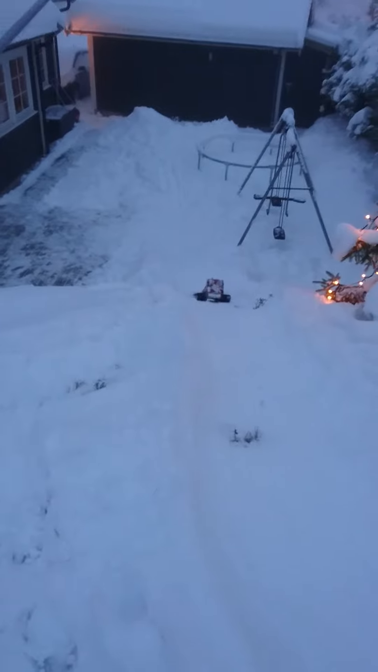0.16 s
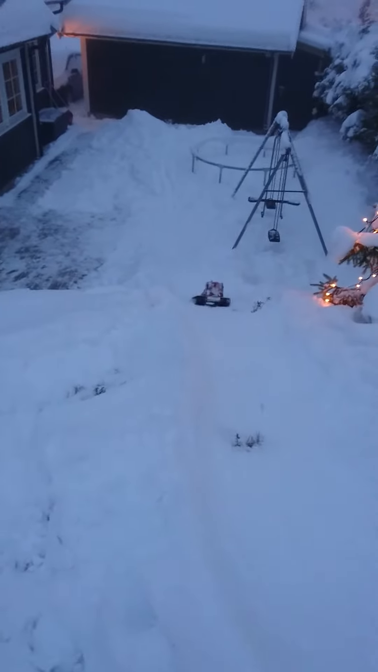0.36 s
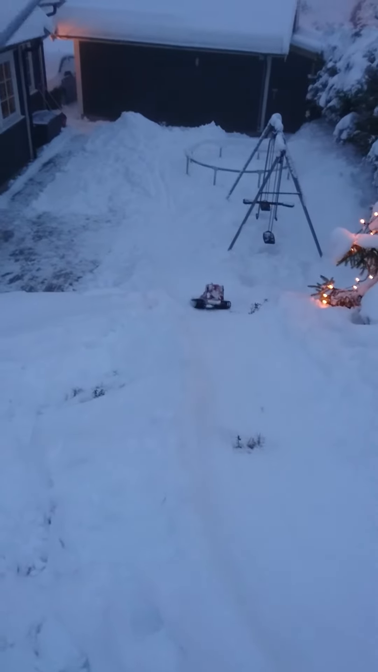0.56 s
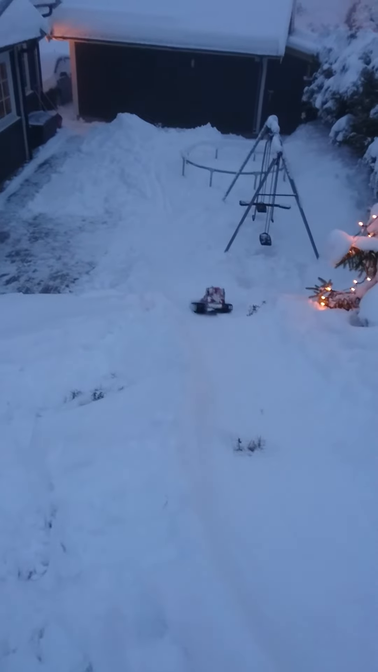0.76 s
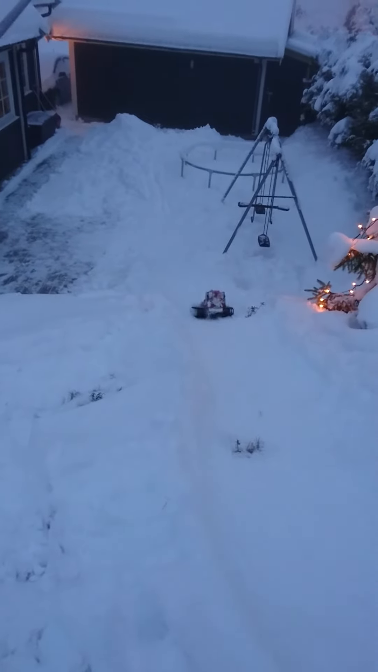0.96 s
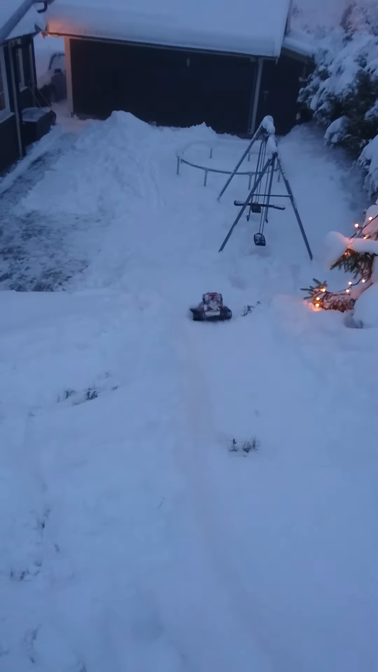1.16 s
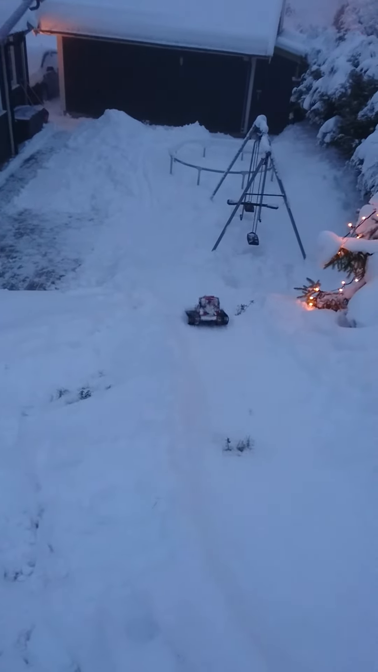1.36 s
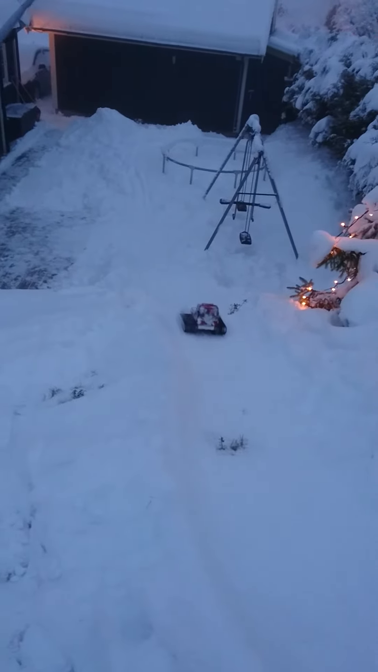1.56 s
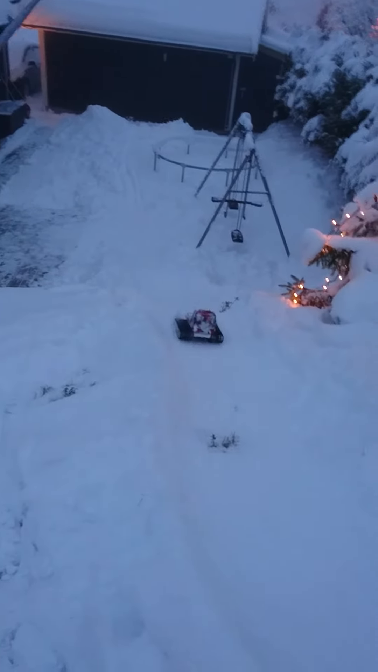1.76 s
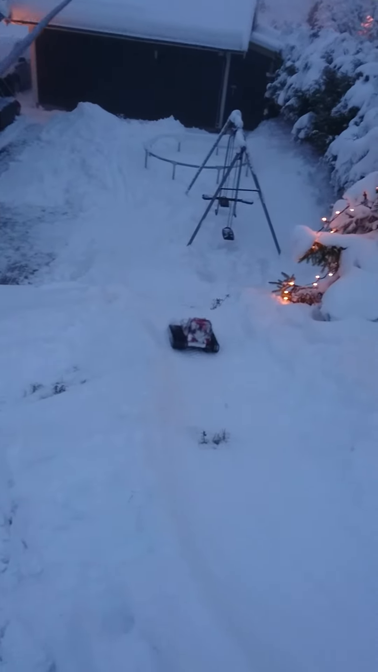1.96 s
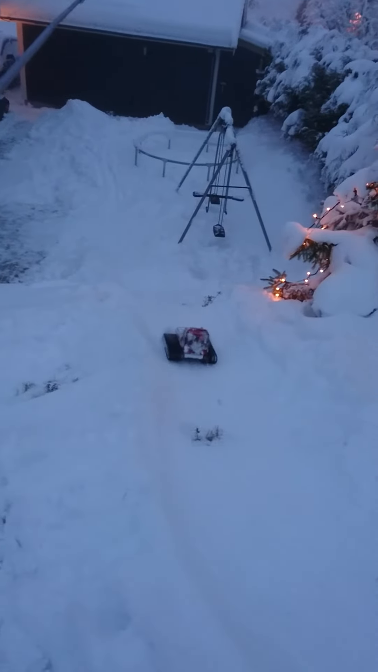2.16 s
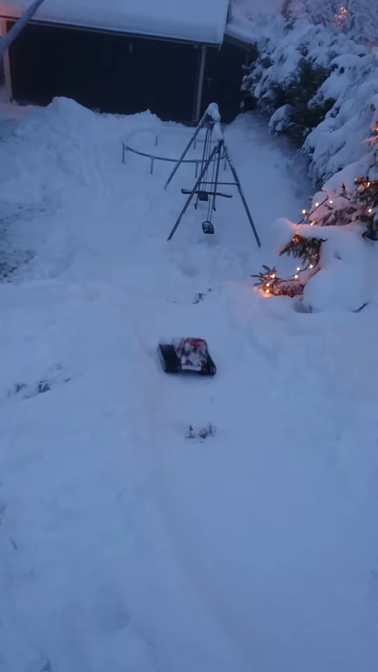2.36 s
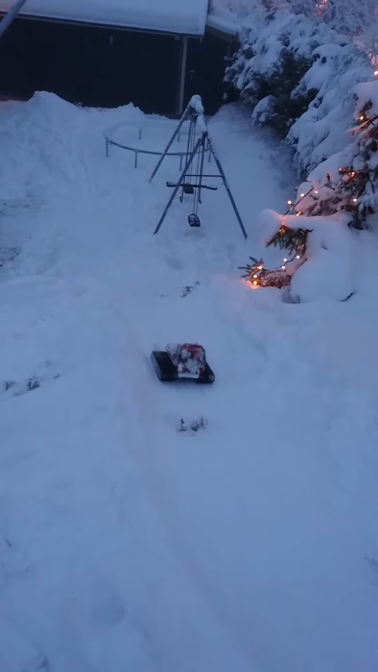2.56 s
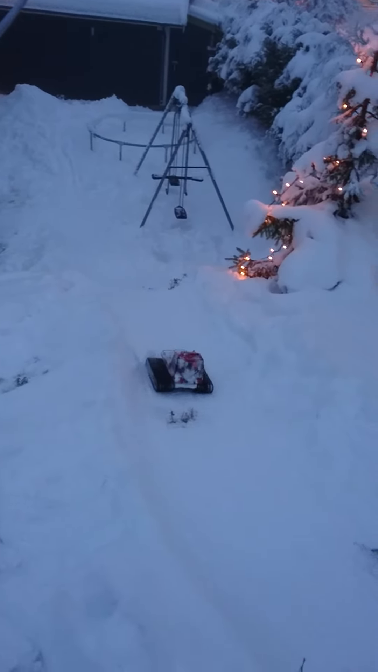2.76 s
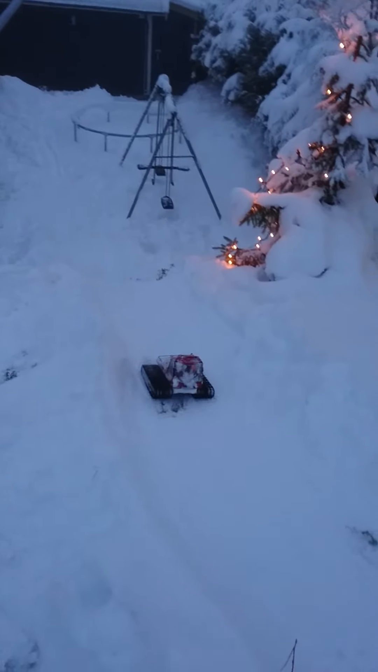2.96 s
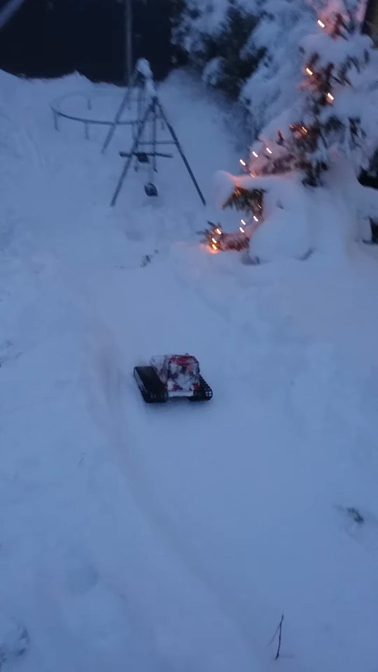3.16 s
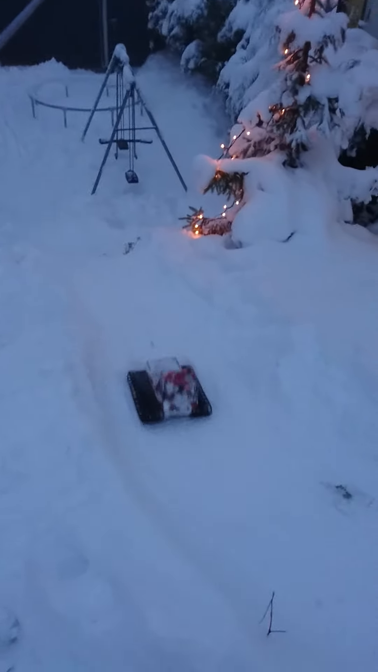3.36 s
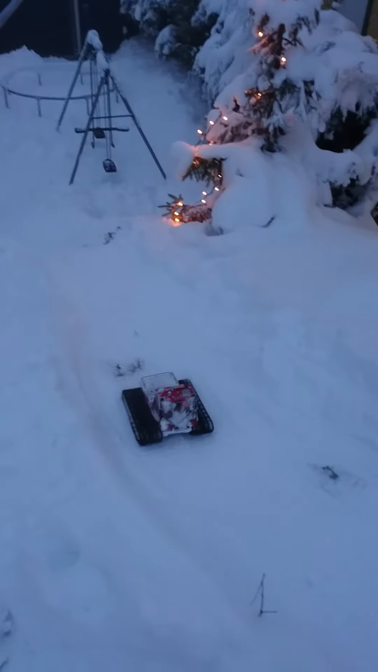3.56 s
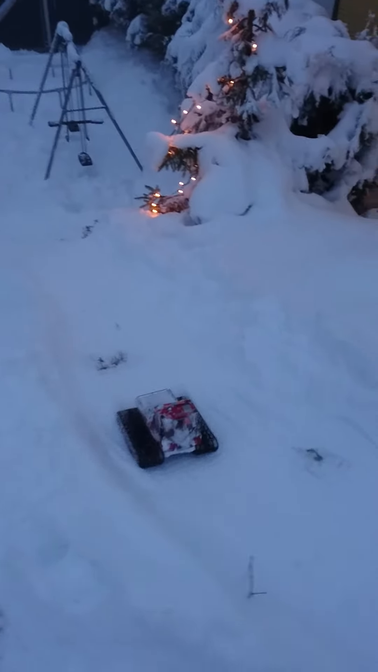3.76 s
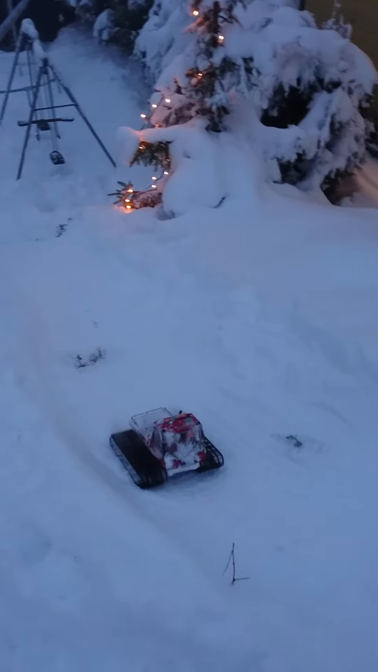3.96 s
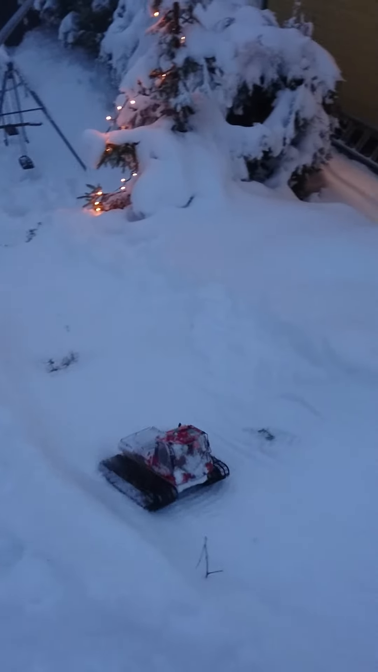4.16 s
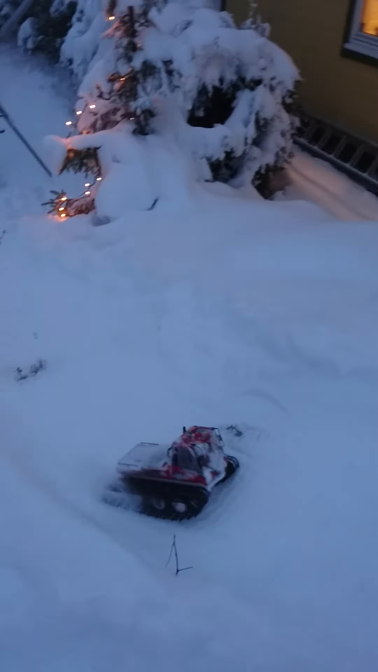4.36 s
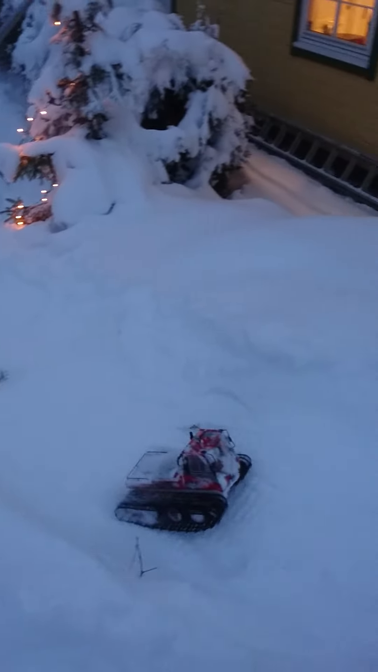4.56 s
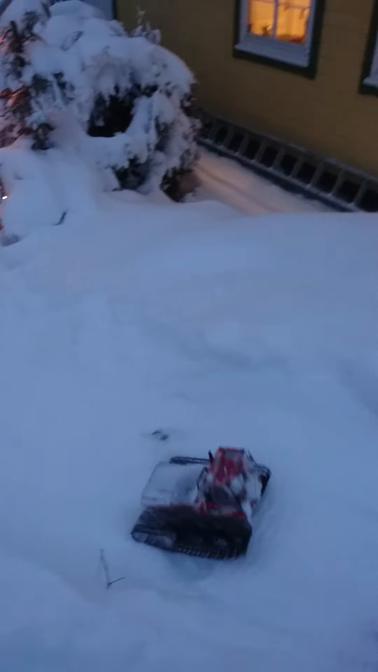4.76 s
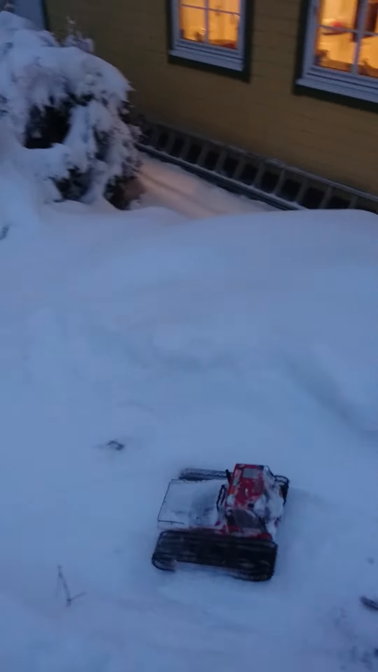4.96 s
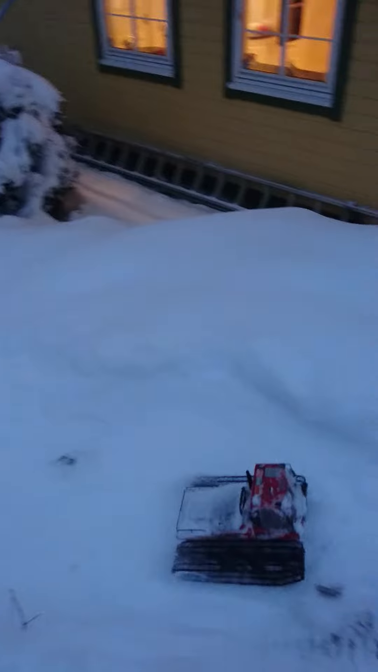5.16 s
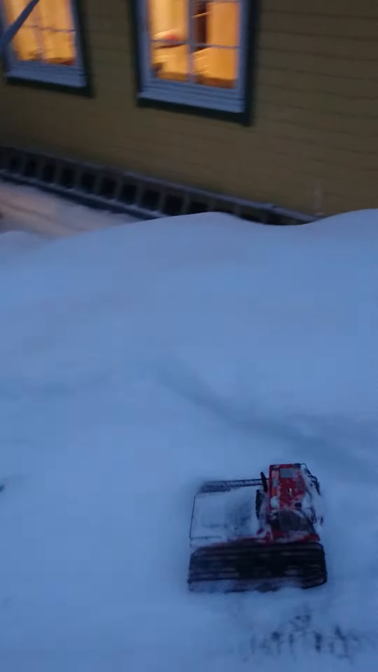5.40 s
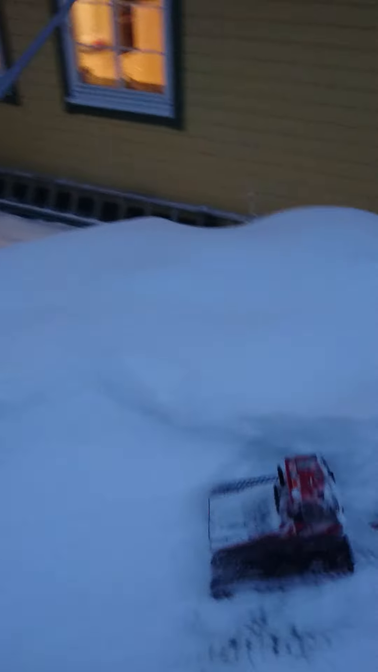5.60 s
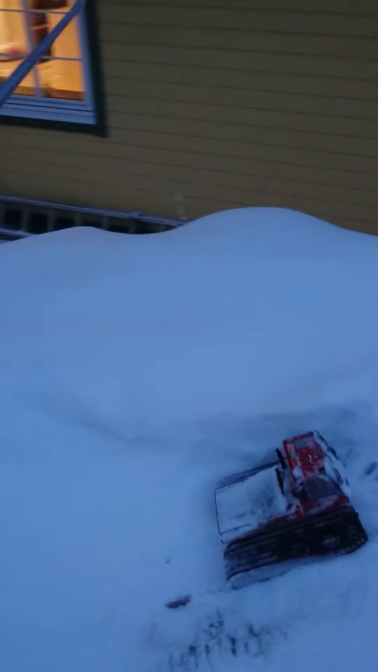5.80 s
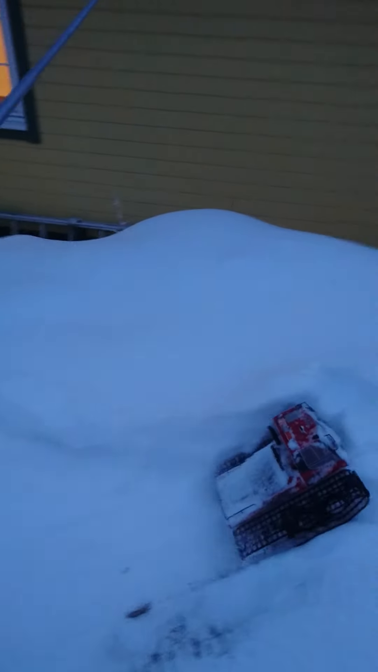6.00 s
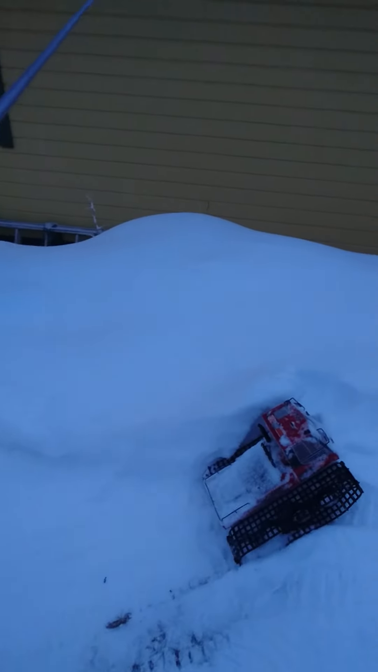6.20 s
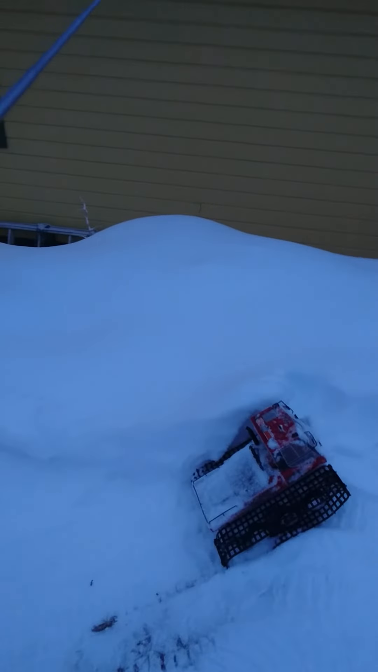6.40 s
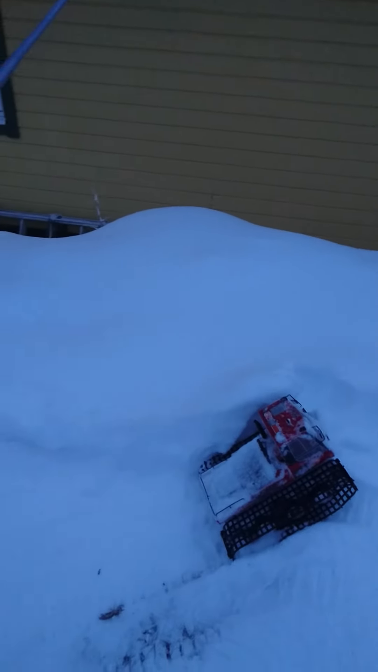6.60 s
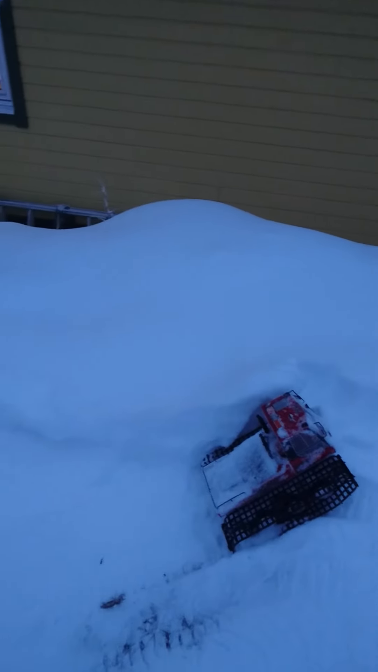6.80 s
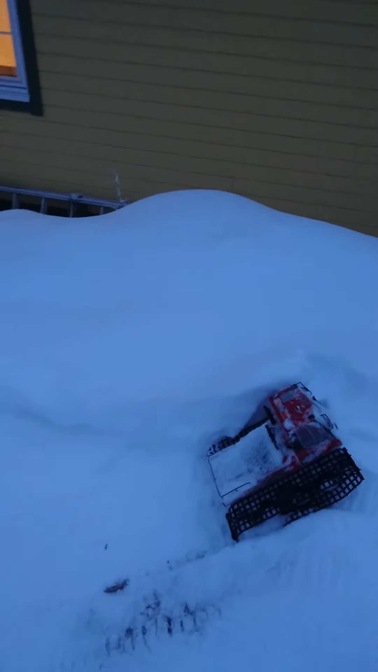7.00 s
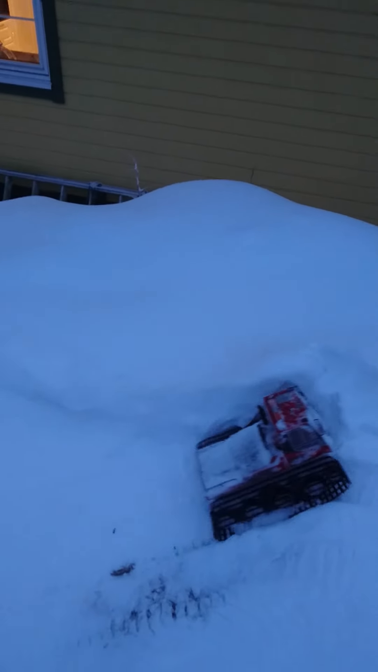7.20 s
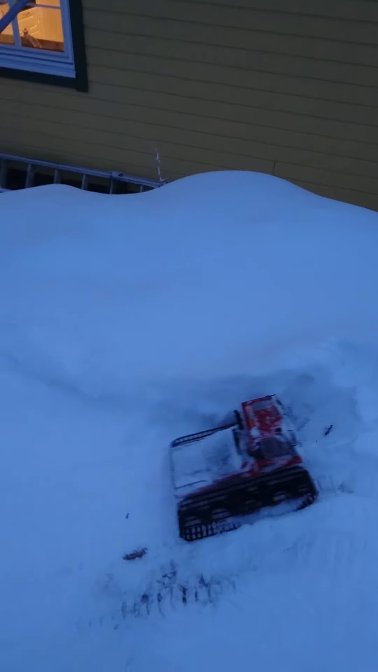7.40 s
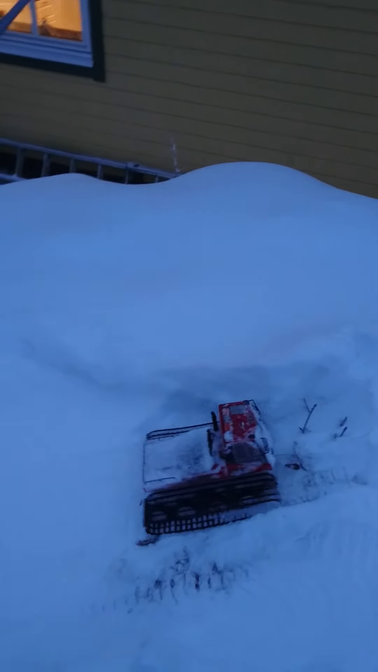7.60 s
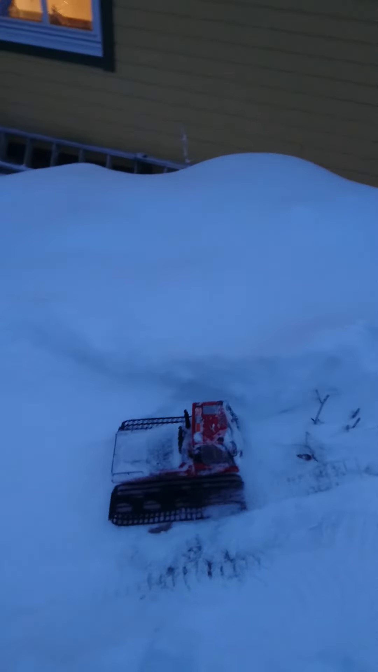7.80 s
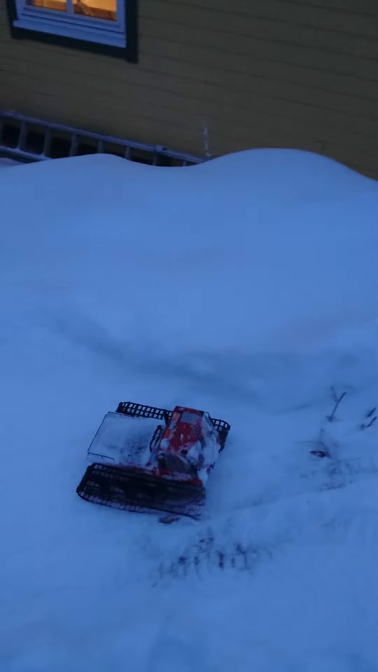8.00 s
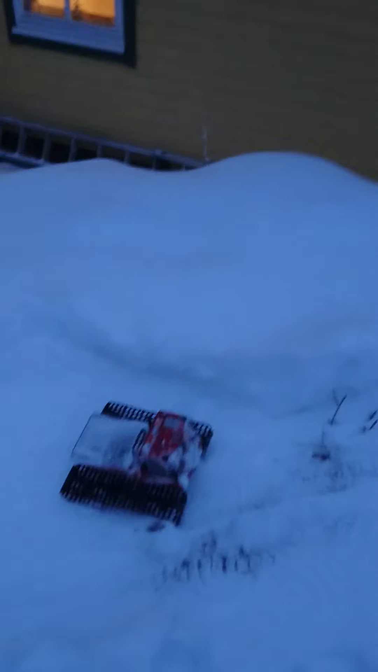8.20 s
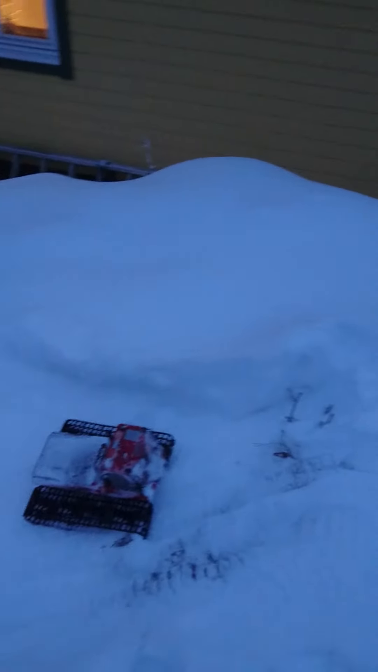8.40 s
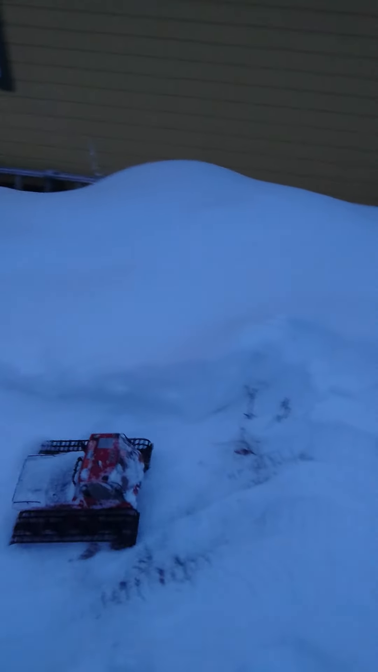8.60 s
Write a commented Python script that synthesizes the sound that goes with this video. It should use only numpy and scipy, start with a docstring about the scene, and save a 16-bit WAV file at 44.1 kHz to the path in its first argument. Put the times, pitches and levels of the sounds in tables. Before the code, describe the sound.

A small electric tracked model whines through snow, stops, then reverses, while fingers bump on the microphone.

```python
"""Model snow groomer in deep snow

Two geared electric track drives crawl closer, stop, then back away in a turn, one running slower.
Meshing teeth whine, cleats crush snow, links rattle and thrown crystals hiss. Fingers bump and rub
the hand-held camera's case and shade its right microphone port."""
import sys
import numpy as np
from scipy import signal
from scipy.fft import rfft, irfft, next_fast_len
from scipy.io import wavfile

SR = 44100
rng = np.random.default_rng(int(sys.argv[2]) if len(sys.argv) > 2 else 0)


def store_pcm(level_fs):
    """Save levels as 16-bit WAV."""
    pcm = np.round(np.clip(level_fs, -1, 1) * 32767).astype(np.int16)
    wavfile.write(sys.argv[1], SR, np.atleast_2d(pcm).T)


N = 381465
TIME = np.arange(N) / SR


def from_db(db):
    """Decibels to gain."""
    return 10 ** (np.asarray(db) / 20)


def rms_one(x):
    """Scale to unit power."""
    return x / np.sqrt(np.mean(np.abs(x) ** 2) + 1e-20)


def in_time(rows):
    """One linearly interpolated curve per column after time."""
    times, *columns = np.transpose(rows)
    return [np.interp(TIME, times, column) for column in columns]


def swells(rows):
    """Summed bell curves, one per column after time and half length."""
    return sum(np.outer(heights, np.exp(-((TIME - s) / half) ** 2)) for s, half, *heights in rows)


def table_gate(rows):
    """1 while the table lasts, with 10 ms fades."""
    return np.clip(np.minimum(TIME - rows[0][0], rows[-1][0] - TIME) * 100 + 1, 0, 1)


def run_envelope(start_s, end_s, rise_s=0.067, decay_s=0.031):
    """Linear run-up, hold, exponential run-down."""
    return np.clip((TIME - start_s) / rise_s, 0, 1) * np.exp(-np.clip((TIME - end_s) / decay_s, 0, 20))


def drift(rate_hz):
    """Smooth random curve of unit power."""
    size = next_fast_len(N)
    hz = np.arange(size // 2 + 1) * SR / size
    return rms_one(irfft(rfft(rng.standard_normal(size)) / (1 + (hz / rate_hz) ** 2), size)[:N])


def panned(pan_db):
    """Constant-power gains, left over right by pan_db."""
    ratio = from_db(np.atleast_1d(pan_db))
    return np.array([ratio, np.ones_like(ratio)]) * np.sqrt(2 / (1 + ratio ** 2))


def coloured(x, spectrum):
    """Shape x by a spectrum table; unit power."""
    size = next_fast_len(N)
    hz, db = np.transpose(spectrum)
    bins_hz = np.arange(size // 2 + 1) * SR / size + 1
    gain = from_db(np.interp(np.log(bins_hz), np.log(hz), db))
    return rms_one(irfft(rfft(x, size) * gain, size)[..., :N])


def grains(per_s, spread_db, hiss, alike):
    """Random clicks on a bed of hiss, partly shared by both ports."""
    sizes = from_db(spread_db * np.minimum(rng.exponential(1, N), 4))
    clicks = rms_one((rng.random(N) < per_s / SR) * sizes)
    shared = np.sqrt(alike) * rng.standard_normal(N)
    separate = np.sqrt(1 - alike) * rng.standard_normal((2, N))
    return (clicks + hiss) * (shared + separate)


def peak_db(x, centre, half_width):
    """Response of a resonance or beam: about 0 dB on top, with a floor."""
    return 10 * np.log10(0.019 + 1 / (1 + ((x - centre) / half_width) ** 2))


# Groomer's range: t/s, distance/m
DISTANCE = [(0, 10.5), (1.6, 7.56), (3, 4.7), (4, 3.03), (5.3, 2.266), (8.65, 2.49)]

def heard_db(near_db, doubling_db, near_m=2.2):
    """Level over snow: near_db at near_m, less doubling_db per doubling of distance."""
    distance_m, = in_time(DISTANCE)
    return near_db - doubling_db * np.log2(distance_m / near_m)


def gear_phase(mesh_hz, hunt):
    """Mesh angle; changing load makes the speed hunt."""
    return 2 * np.pi * np.cumsum(mesh_hz * (1 + hunt * drift(21.91))) / SR


# Groomer's bearing: t/s, left port lag/samples
BEARING = [(0, -1), (3.5, -3.5), (4.8, 4)]
OUTPUT_TEETH = 81

def gear_tone(phase, multiple, level_db, pan_db, rough, smear_hz, wobble=.5, port_rad=0):
    """One gear partial: eccentric gears add sidebands, backlash smears the line."""
    turn = phase / OUTPUT_TEETH
    swing = wobble * (np.sin(turn + 2 * drift(2.2)) + np.sin(2 * turn + 2 * drift(2.2)))
    direct = np.exp(1j * swing) + rough * (drift(smear_hz) + 1j * drift(smear_hz))
    direct /= np.abs(direct) ** .5   # slack teeth vary more in time than in force
    direct *= 1 + np.minimum(.18 * multiple, .5) * np.sin(turn)   # teeth press harder once a turn
    echoes = .25 * np.array([drift(smear_hz), 1j * drift(smear_hz)])
    left_lag_rad = multiple * in_time(BEARING)[0] * np.gradient(phase) + port_rad
    carrier = np.exp(1j * np.array([multiple * phase - left_lag_rad, multiple * phase]))
    return from_db(level_db) * panned(pan_db) * rms_one(np.real((direct + echoes) * carrier))


# Forward drive under throttle: t/s, mesh f/Hz
FORWARD_MESH = [(0, 3402), (1.0, 3417), (1.22, 3372), (1.8, 3661), (2.501, 3695), (3.42, 3627),
                (3.58, 3775), (3.9, 3687), (4.12, 3410), (4.38, 3233), (4.6, 3527), (4.81, 3347),
                (5.05, 3718), (5.13, 3540), (5.29, 3584), (5.54, 3444), (5.78, 3487), (6.108, 3198)]
THROTTLE_OFF_S = FORWARD_MESH[-1][0]

def forward_mesh_hz(stop_s=.135):
    """Mesh rate; once the throttle shuts, snow brakes the drives ever harder."""
    braking = np.clip((TIME - THROTTLE_OFF_S) / stop_s, 0, 1)
    return in_time(FORWARD_MESH)[0] * (1 - braking ** 1.6)


def cleat_bite(mesh_hz, range_db, cycles_per_cleat=432, aligned_s=2.7):
    """Load ripple of cleats biting in step with the drive, every other one harder; deeper far off."""
    cleats = np.cumsum(mesh_hz) / SR / cycles_per_cleat
    step = 2 * np.pi * (cleats - np.interp(aligned_s, TIME, cleats))
    ripple = (np.cos(step) + np.cos(step / 2) / 2) / 2
    return ripple * (1 - from_db(range_db) / 2) * (1 + .5 * np.tanh(drift(2)))


def shaft_hum(mesh_phase):
    """The motor shaft hums far below the mesh."""
    gain = from_db(heard_db(-64, 0.78)) * np.interp(TIME, [1, 1.4, 4, 5], [0, 1, 1, 0])
    return gain * np.sin(.1285 * mesh_phase + drift(12)) * (1 + .5 * drift(23))


# Gear load swells: t/s, half length/s, mesh gain/dB, octave gain/dB
GEAR_LOADS = [(0.7, 0.51, 8, -0.5), (3.65, 0.24, 4, -4.5), (4.27, 0.17, -4, -1.5), (4.64, 0.2, -4, 6.5),
              (4.96, 0.022, 3.5, 2.5), (5.04, 0.028, -5, -6), (5.095, 0.018, 3.5, -0.5),
              (5.22, 0.12, 4.5, 0), (5.7, 0.082, 2, -1)]
# Steering: t/s, second drive's speed lead/%
STEERING = [(1.3, 1), (3.7, 4), (5.1, 3.5), (5.8, 2), (6.05, -4.5)]
# Lesser tones, peaking as a gearbox side faces the listener:
# mesh multiple, near level/dB, peak t/s, half length/s, port phase/rad
SIDE_TONES = [(0.398, -54, 4.9, 0.3, -0.5), (0.501, -47, 5.75, .25, 2), (1.181, -43.5, 4.3, 0.14, -0.5),
              (3, -49.5, 5.75, 0.34, 1.5), (4, -53, 5.2, .25, 0)]
MESH_RING_HZ, OCTAVE_RING_HZ = 3637, 6850

def forward_whine():
    """Two drives beat; the whine swells at gearbox resonances and frays as the load eases."""
    mesh_hz = forward_mesh_hz()
    range_db = heard_db(0, 5.0)
    bite = cleat_bite(mesh_hz, range_db)
    mesh_load_db, octave_load_db = swells(GEAR_LOADS)
    slack = from_db(-mesh_load_db / 2)
    base_db = heard_db(-25.5, 10.28)
    mesh_db = base_db + peak_db(mesh_hz, MESH_RING_HZ, 176) + mesh_load_db
    mesh_hz = mesh_hz * (1 - 0.0281 * bite)   # each bite slows the drive
    octave_db = heard_db(-37.5, 4.15) + peak_db(2 * mesh_hz, OCTAVE_RING_HZ, 310) + octave_load_db
    # braking sweeps the octave through the lower resonance
    dive_db = base_db - 5.5 + peak_db(2 * mesh_hz, MESH_RING_HZ, 520) - 20 * (TIME < THROTTLE_OFF_S)
    octave_db = np.maximum(octave_db, dive_db)
    octave_pan_db = 2.5 - 3.0 * in_time(BEARING)[0]
    lead_pct, = in_time(STEERING)
    second_mesh_db = mesh_db - 4.5 + 0.21 * range_db
    second_octave_db = octave_db + range_db / 2 - 4 - np.abs(lead_pct)

    first = gear_phase(mesh_hz, hunt=.005)
    second = gear_phase(mesh_hz * (1 + lead_pct / 100), hunt=.008)
    out = gear_tone(first, 1, mesh_db - 3, pan_db=-10.5, rough=0.43 * slack, smear_hz=120)
    out += gear_tone(second, 1, second_mesh_db, pan_db=-11, rough=0.94 * slack, smear_hz=315, wobble=1)
    out += gear_tone(first, 2, octave_db + 5 * bite, octave_pan_db,
                     rough=from_db(range_db / 2), smear_hz=148)
    out += gear_tone(second, 2, second_octave_db, octave_pan_db, rough=0.9, smear_hz=250)
    for multiple, db, peak_s, half_s, port_rad in SIDE_TONES:
        level_db = db + range_db + peak_db(TIME, peak_s, half_s)
        level_db += (multiple < 1) * range_db   # low tones carry least far
        out += gear_tone(first, multiple, level_db, pan_db=-1.5, rough=1.4,
                         smear_hz=170 * multiple ** 0.67, port_rad=port_rad)
    return (out + shaft_hum(first)) * run_envelope(TRACK_RUNS[0][0], THROTTLE_OFF_S + 0.067)


def hull_echo(x, delay_s=0.00144, gain=0.22):
    """A short echo in the open hull cuts notches that shift as the model rocks."""
    lag = delay_s * SR * (1 + 0.038 * drift(3.1))
    samples = np.arange(N)
    return rms_one(x + gain * np.array([np.interp(samples - lag, samples, side) for side in x]))


# Tracks moving: start/s, end/s, crunch gain/dB, rattle gain/dB, spray gain/dB
TRACK_RUNS = [(-1, 6.185, 0, 0.5, 0), (7, 8.23, -5.5, -2.5, -2), (8.5, 8.58, -19, -9, -10.5),
              (8.5, 9, 3, 10, 13)]
# Tracks digging in: t/s, half length/s, crunch gain/dB, rattle gain/dB, spray gain/dB
TRACK_DIGS = [(3.3, 1, 4.5, 1, -1), (3.48, 0.21, -0.5, -4, 2.5), (3.93, 0.047, 4.5, 4, 3),
              (5.85, 0.36, 1.5, -1, 3), (6.16, 0.037, 3.5, 1, -3), (8.07, 0.2, 5.5, 3.5, 0.5)]
# Crushed snow: f/Hz, level/dB
CRUNCH_SPECTRUM = [(70, 7), (170, 9), (400, 3), (1200, -1.5), (1900, -3), (3000, 6.5), (4500, 4),
                   (8000, -28)]
# Rattling links, heard through a broad bright peak near 6 kHz: f/Hz, level/dB
RATTLE_SPECTRUM = [(1500, -40), (4100, 1), (4750, 3.5), (6300, 5.5), (7350, 3.5), (8100, -21.5),
                   (10400, -14.5), (12000, -45)]
# Thrown crystals: f/Hz, level/dB
SPRAY_SPECTRUM = [(2000, -1), (6000, -3), (10500, 0.5), (13300, -8), (15500, -2.5)]
RUN_UP_S = (0.067, 0.062, 0.3)   # crunch, rattle, spray: snow flies only at speed

def tracks():
    """Cleats crush snow, links rattle round the wheels, thrown crystals hiss."""
    runs = np.zeros((3, N))
    for start_s, end_s, *gains_db in TRACK_RUNS:
        for run, db, rise_s in zip(runs, gains_db, RUN_UP_S):
            run += from_db(db) * run_envelope(start_s, end_s, rise_s)
    crushing, rolling, throwing = runs * from_db(swells(TRACK_DIGS))
    # links flutter with each turn of the output gear
    turn = gear_phase(forward_mesh_hz(), hunt=0.017) / OUTPUT_TEETH
    flutter_db = drift(26) + .5 * (np.sin(turn) + np.sin(2 * turn)) * table_gate(FORWARD_MESH)
    crunch = coloured(hull_echo(grains(1500, 0.79, hiss=0.98, alike=0.73)), CRUNCH_SPECTRUM)
    rattle = coloured(hull_echo(grains(1200, 1.5, hiss=.5, alike=0.1)), RATTLE_SPECTRUM)
    spray = coloured(grains(1000, 1.7, hiss=1, alike=.1), SPRAY_SPECTRUM)
    crunch *= crushing * from_db(heard_db(-44, 8.4)) * panned(-2.7)
    rattle *= rolling * from_db(heard_db(-43.5, 3.5)) * panned(-7.5)
    spray *= throwing * from_db(heard_db(-45, 10.1)) * panned(-1)
    return (crunch + rattle + spray) * from_db(flutter_db)


# Background hiss: f/Hz, level/dB
HISS_SPECTRUM = [(410, -37), (700, -5.5), (1250, -18), (6680, 1), (9850, -14)]

def background():
    """A faint even hiss, heard when the model stands still."""
    return from_db(-63) * coloured(rng.standard_normal((2, N)), HISS_SPECTRUM) * panned(-4.5)


# Hand on the case: f/Hz, level/dB
GRIP_SPECTRUM = [(50, 5.5), (220, 0), (600, -17.5), (1500, -63)]

def grip():
    """The hand shifts on the case: a lumpy low rustle, strongest around the heavier bumps."""
    shifts = [np.exp(-np.abs(TIME - s) / 0.32) * np.clip((thud_db + 70) / 18, 0, 1)
              for s, thud_db, *_ in FINGER_BUMPS]
    level_db = np.interp(TIME, [1.3, 2.3], [-60.5, -67]) + 11 * np.max(shifts, axis=0) + 2 * drift(5.7)
    rustle = coloured(grains(76, 2.5, hiss=1.0, alike=0.97), GRIP_SPECTRUM)
    return rustle * from_db(level_db) * panned(-12)


# Finger slides: t/s, level/dB
FINGER_SLIDES = [(0.303, -52), (0.536, -48), (1.221, -46.5)]

def finger_slides():
    """Skin drags over the case in short gritty scuffs near the right port."""
    strokes = sum(from_db(db) * np.exp(-((TIME - s) / 0.019) ** 2) for s, db in FINGER_SLIDES)
    band = signal.butter(2, [110, 1100], "band", fs=SR, output="sos")
    grit = rms_one(signal.sosfilt(band, grains(543, 1.6, hiss=0.59, alike=0.28)))
    return strokes * grit * panned(-20)


# Finger over the right port: t/s, half length/s, mid loss/dB, treble loss/dB
PORT_SHADES = [(0.36, 0.13, 14, 21), (3.33, 0.09, 9, 28), (3.6, 0.17, -1.5, 14)]

def shade_right_port(sound, notch_hz=4770, edges_hz=(1200, 4500)):
    """The right port is deaf to a narrow band, and a passing finger dulls it."""
    left, right = sound
    right = signal.lfilter(*signal.iirnotch(notch_hz, Q=9, fs=SR), right)
    mid_loss_db, treble_loss_db = swells(PORT_SHADES)
    low, below_treble = [signal.sosfiltfilt(signal.butter(4, hz, fs=SR, output="sos"), right)
                         for hz in edges_hz]
    mid = (below_treble - low) * from_db(-mid_loss_db)
    treble = (right - below_treble) * from_db(-treble_loss_db)
    return np.array([left, low + mid + treble])


# Finger taps: t/s, thud gain/dB, knock gain/dB, knock f/Hz, tick gain/dB
FINGER_BUMPS = [(0.58, -43, -31.5, 165, -64), (0.702, -45, -37.5, 151, -45), (0.762, -67, -38, 1300, -43),
                (.807, -35, -27.5, 168, -32), (0.91, -51, -23, 198, -56), (1.228, -31, -25, 94.66, -40),
                (1.539, -50, -36.5, 159.9, -55), (2.235, -37, -26.5, 229.4, -30.5),
                (2.861, -58, -38, 220, -60), (3.052, -42.5, -40, 170, -50), (3.119, -48, -37, 210, -52),
                (3.302, -43, -26.5, 565, -50), (3.47, -43.5, -37.5, 200, -55),
                (3.583, -38, -30, 197.3, -31.5), (3.773, -38.5, -22, 180, -29.5),
                (4.242, -46, -32, 170.3, -53), (4.883, -60, -27, 326, -49), (5.248, -52, -28.5, 256.9, -34),
                (5.689, -63, -26.5, 305.5, -49), (6.656, -52, -27.5, 198, -72), (6.734, -62, -33, 131, -73),
                (6.908, -47.5, -36, 184, -76), (7.183, -38, -31, 153, -35),
                (7.759, -38.5, -23.5, 300, -30.5), (8.314, -42.5, -19, 191, -42.5),
                (8.537, -48, -29.5, 274, -42)]

def finger_bumps():
    """A finger taps the case: a tick, a deep thud at both ports, a hollow knock at the right one."""
    out = np.zeros((2, N + SR))
    t = np.arange(SR // 5) / SR
    tick_band = signal.butter(4, [350, 3800], "band", fs=SR, output="sos")
    scuff_band = signal.butter(2, [120, 620], "band", fs=SR, output="sos")
    for s, thud_db, knock_db, knock_hz, tick_db in FINGER_BUMPS:
        thud = -np.sin(2 * np.pi * 85 * t) * from_db(thud_db + 6.5 - 60 * t / 0.089)
        thud *= 1 - np.exp(-t / 0.0014)
        rise = t * knock_hz / 0.82   # soft fingertip: the knock swells over about a cycle
        swell = (rise * np.exp(1 - rise)) ** 4.65
        knock = np.sin(2 * np.pi * knock_hz * t) * swell * from_db(knock_db + 5)
        case_ring = np.sin(2 * np.pi * 340 * t) * from_db(knock_db - 8 - 60 * t / 0.083)
        knock += case_ring * np.minimum(rise, 1)
        scuff = signal.sosfilt(scuff_band, rng.standard_normal(len(t))) * from_db(knock_db - 60 * t / 0.071)
        contact = rng.standard_normal(len(t)) * from_db(-10 - 60 * t / .02) + 10 * (t == 0)
        tick = signal.sosfilt(tick_band, contact) * from_db(tick_db + 6)
        left = thud + (knock + scuff) * from_db(-19) + tick * from_db(-7)
        right = thud * from_db(4) + knock + scuff + tick
        at = int(s * SR)
        out[:, at:at + len(t)] += [left, right]
    return out[:, :N]


# Links snapping taut: t/s, gain/dB
LINK_SNAPS = [(3.917, -22), (7.182, -23)]

def link_snaps(t60_s=0.028, band_hz=(5400, 6500)):
    """A track link jumps taut with one short, bright click."""
    bursts = sum(from_db(db - 60 * np.clip(TIME - s, 0, 1) / t60_s) * (TIME >= s)
                 for s, db in LINK_SNAPS)
    band = signal.butter(1, band_hz, "band", fs=SR, output="sos")
    return signal.sosfilt(band, bursts * rng.standard_normal((2, N)))


def controller_buzz(switching_hz=983):
    """The speed controller's switching sings faintly in the motors while reversing."""
    phase = gear_phase(switching_hz, hunt=.006)
    buzz = sum(np.sin(k * phase) * (1 + drift(16)) for k in range(1, 5))
    return from_db(-67) * buzz * run_envelope(start_s=7.1, end_s=TRACK_RUNS[1][1])


def drive_whine(rows, mesh_db, octave_db, mesh_ease_db=3, free_hz=2350, loaded_hz=1790):
    """One drive's mesh tone and octave: louder under load, sputtering with slip, fading at stall."""
    mesh_hz, = in_time(rows)
    slack = np.clip((mesh_hz - loaded_hz) / (free_hz - loaded_hz), 0, 1)
    stall_db = np.interp(mesh_hz, [1000, 1600], [-5, 0])
    effort_db = stall_db + 0.83 * swells(TRACK_DIGS)[0] + 3 * np.tanh(drift(25))
    phase = gear_phase(mesh_hz, hunt=.007)
    mesh_db = mesh_db + effort_db - mesh_ease_db * slack
    octave_db = octave_db + effort_db - 30 * slack
    mesh = gear_tone(phase, 1, mesh_db, pan_db=-4, rough=1, smear_hz=70)
    octave = gear_tone(phase, 2.003, octave_db, pan_db=-6.5, rough=0.75, smear_hz=110)
    return (mesh + octave) * table_gate(rows)


# Slower drive in reverse: t/s, mesh f/Hz
INNER_MESH = [(7.2, 1900), (7.24, 1410), (7.32, 2090), (7.65, 2351), (7.96, 2080), (8.03, 1530),
              (8.08, 1440), (8.15, 1585), (8.2, 1418), (8.245, 980)]
# Faster drive in reverse: t/s, mesh f/Hz
OUTER_MESH = [(7.305, 3010), (7.36, 3160), (7.45, 3190), (7.52, 3410), (7.78, 3490), (7.85, 3200),
              (7.96, 3210)]
# Pulling away again: t/s, mesh f/Hz
RESTART_MESH = [(8.605, 2000), (8.66, 2210)]

def reversing_whine():
    """Unequal drive speeds back the model round a turn; after a pause it pulls away again."""
    inner = drive_whine(INNER_MESH, mesh_db=-54, octave_db=-38)
    outer = drive_whine(OUTER_MESH, mesh_db=-51, octave_db=-36.5,
                        mesh_ease_db=34, free_hz=3900, loaded_hz=3090)
    restart = drive_whine(RESTART_MESH, mesh_db=-50, octave_db=-29)
    return inner + outer + restart


def scene():
    """The groomer in the snow, background hiss and handling noise."""
    groomer = forward_whine() + controller_buzz() + reversing_whine() + tracks() + link_snaps()
    return shade_right_port(groomer) + background() + finger_bumps() + finger_slides() + grip()


def record(dry):
    """Band limit: 43 Hz to 15850 Hz."""
    dry = signal.sosfilt(signal.butter(7, 43, "high", fs=SR, output="sos"), dry)
    return signal.sosfilt(signal.ellip(12, .1, 80, 15850, fs=SR, output="sos"), dry)


dry = scene()
out = record(dry)
store_pcm(out)
```